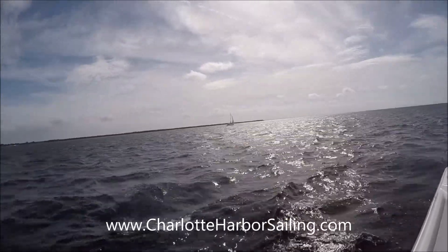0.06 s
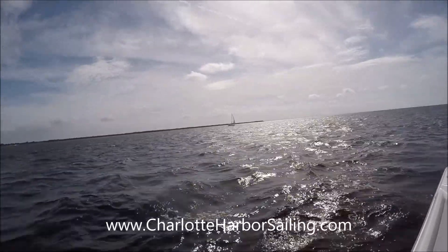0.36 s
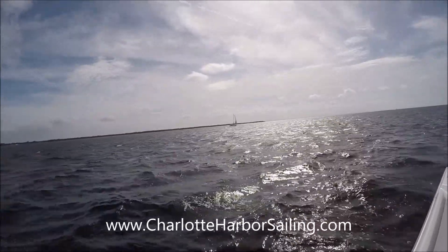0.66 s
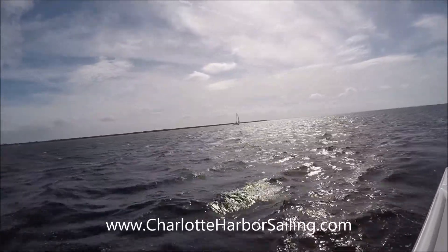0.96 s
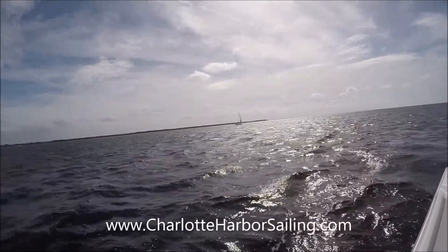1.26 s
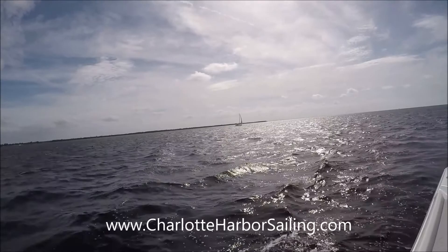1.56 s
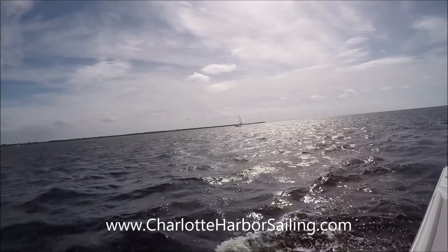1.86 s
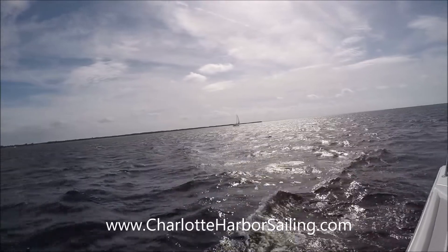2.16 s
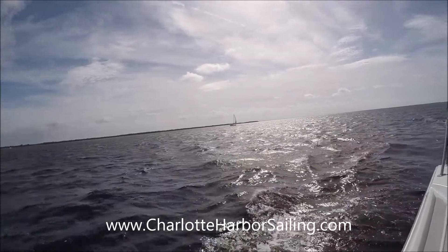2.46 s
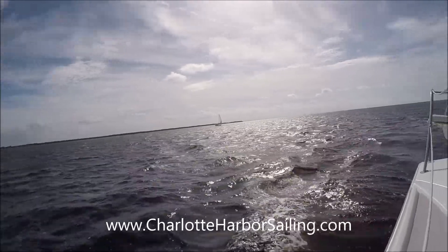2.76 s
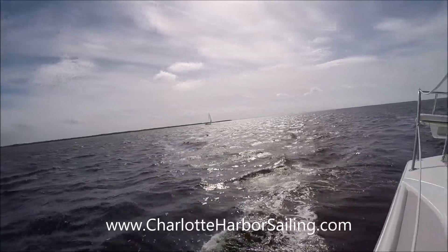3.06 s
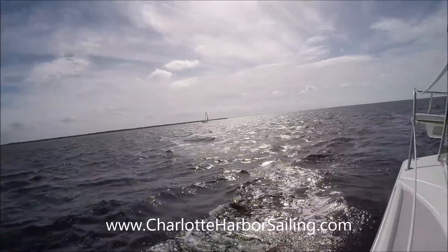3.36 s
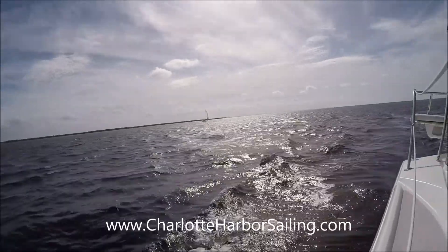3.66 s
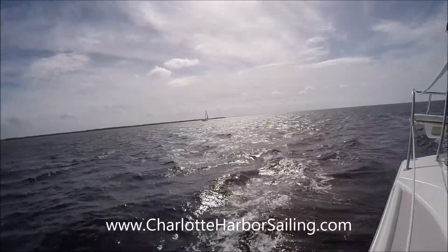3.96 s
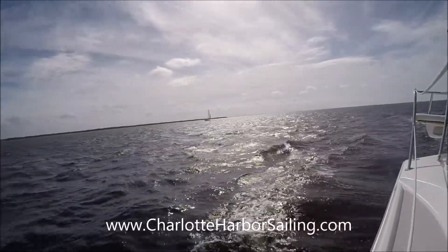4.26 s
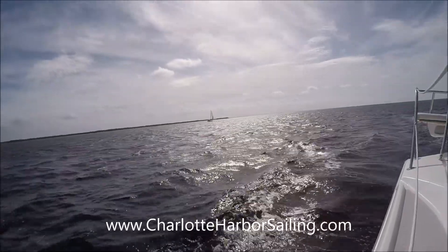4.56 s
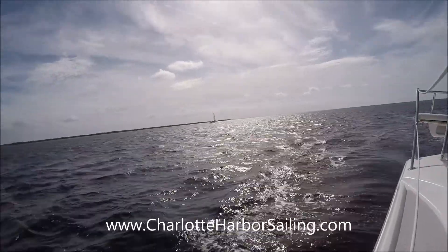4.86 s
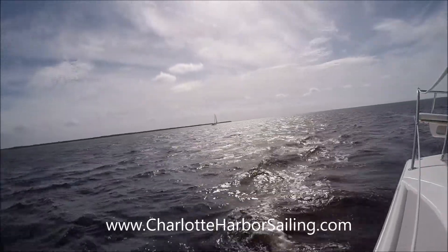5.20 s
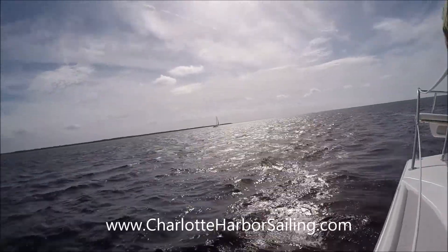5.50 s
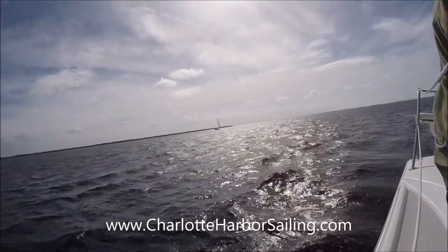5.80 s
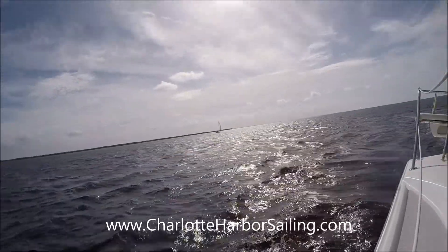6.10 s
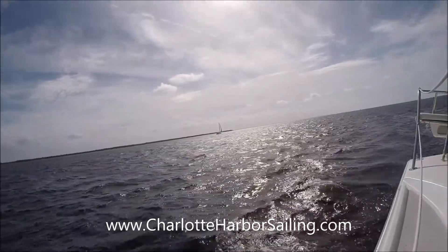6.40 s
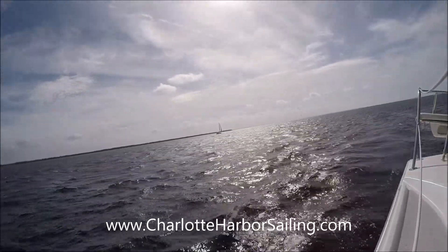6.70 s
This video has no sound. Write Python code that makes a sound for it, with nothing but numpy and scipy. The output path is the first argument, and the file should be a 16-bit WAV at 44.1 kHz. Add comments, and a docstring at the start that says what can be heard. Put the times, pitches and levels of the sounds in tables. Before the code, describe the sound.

Wind buffets a microphone on the deck of a moving sailboat, a deep, booming rumble that lasts the whole seven seconds. Under it, water churns and gurgles along the hull in uneven surges, trailing a hiss of foam and sounding slightly boxy. Bubbles plop at the start, followed by a light patter of spray and a few small slaps before 1 second. Around 1.3 seconds a gust swells with a low thump, then a slap and close drips and bubbles come between 1.5 and 3 seconds. Another gust arrives near 3.7 seconds with a run of wavelets hitting the side. Low thumps land at about 4.3 seconds, and the sharpest slap at 4.7. The wind dips briefly around 5 seconds and then freshens. More slaps come near 6 seconds, and spray and gurgles carry on under the rumble to the end.

```python
"""Wind buffeting a camera microphone on the deck of a moving sailboat.
Gusts set the camera case booming on two low notes, over a slow sway and a drone. Down along the hull
the bow wave churns, gurgles and leaves hissing foam. Bubbles pop and drops land close by, spray
patters back on the sea and wavelets slap the side, all heard through the case, which rings in a few
narrow bands. Gusts popping on the microphone and knocks on the hull add short low thumps."""
import sys
import numpy as np
from scipy import signal
from scipy.fft import rfft, irfft
from scipy.io import wavfile
from scipy.ndimage import uniform_filter1d

SR = 44100
rng = np.random.default_rng(int(sys.argv[2]) if len(sys.argv) > 2 else 0)


def unload_wav(signal):
    """Save mono or channel-first audio to the path in sys.argv[1] as 16-bit WAV at rate SR, clipped to [-1, 1]."""
    wavfile.write(
        sys.argv[1],
        SR,
        np.round(np.clip(np.atleast_2d(signal).T, -1, 1) * 32767).astype(np.int16),
    )


N = 301644
T = np.arange(N) / SR
HZ = np.fft.rfftfreq(N, 1 / SR)


def amp(db):
    """Decibels to gain."""
    return 10 ** (np.asarray(db) / 20)


def unit(x):
    """Scales to an rms of one."""
    return x / np.sqrt(np.mean(x ** 2) + 1e-20)


def spectrum_gain(spectrum, hz):
    """Gain of a spectrum table at the given frequencies."""
    freq_hz, level_db = np.transpose(spectrum)
    return amp(np.interp(np.log(hz + 1), np.log(freq_hz), level_db))


def fader(curve):
    """Turns rows of time_s, level_db into a gain for every sample."""
    return amp(np.interp(T, *np.transpose(curve)))


def add(mix, start_s, sound):
    """Mixes a sound in at its start time."""
    part = mix[max(round(start_s * SR), 0):][:len(sound)]
    part += sound[:len(part)]


def colour(x, spectrum):
    """Filters by a spectrum table; rms one."""
    return unit(irfft(rfft(x) * spectrum_gain(spectrum, HZ), N))


def flicker(depth_db, rate_hz):
    """A gain that wanders smoothly at random, by depth_db rms."""
    lowpass = np.exp(-(HZ / rate_hz) ** 2) * (HZ > 0)
    return amp(depth_db * unit(irfft(rfft(rng.standard_normal(N)) * lowpass, N)))


# Buffeting right at the microphone, peaking on the two notes of the case: freq_hz, level_db
BOOM_SPECTRUM = [(25, -11), (42, -7.5), (55, -7), (64, 3), (73, -5.5), (83, 1), (92, -6), (100, -15),
                 (118, -27.5), (160, -34), (300, -70), (600, -84)]
# What the upper note gains and the lower one loses: time_s, tilt_db
BOOM_TILT = [(0.0, -2), (1.4, 0), (2.9, -2.5), (3.8, 1), (5.8, 0), (6.84, 4.5)]


def case_boom(gust, split_hz=67.6):
    """Eddies set the camera case booming; the freshening wind favours its upper note."""
    pressure = colour(rng.standard_normal(N), BOOM_SPECTRUM)
    power = uniform_filter1d(uniform_filter1d(pressure ** 2, size=5000), size=3000) + 1e-6
    eddies = unit(pressure / power ** 0.25)  # a steady breeze evens out the deepest lulls
    speed = uniform_filter1d(gust, size=12000) ** 0.0815  # faster air sheds eddies faster
    travel = np.cumsum(speed / speed.mean())
    boom = np.interp(travel, np.arange(N), eddies)
    lower = irfft(rfft(boom) / (1 + (HZ / split_hz) ** 20), N)
    upper = boom - lower
    tilt = fader(BOOM_TILT)
    return gust * (lower / tilt + upper * tilt)


# Strength of the wind on the camera, out on deck: time_s, level_db
GUSTS = [(0.1, -21.5), (0.85, -26.5), (1.12, -26.5), (1.33, -18.5), (1.62, -23.5), (1.86, -21), (2.02, -27),
         (2.85, -22), (3.5, -24.5), (3.76, -18.5), (4.05, -24), (4.36, -20.5), (4.8, -21), (4.96, -27),
         (5.22, -27), (5.32, -21.5), (6.84, -20)]
# Slow sway of pressure and low drone at the microphone: freq_hz, level_db
SWAY_SPECTRUM = [(4, -45), (17, -14), (25, 1), (32, -9), (50, -13), (120, -70)]
DRONE_SPECTRUM = [(70, -25), (125, -1.5), (165, -3), (212, 1), (242, 0.5), (270, -6.5), (300, -13.5),
                  (370, -20.5), (520, -26.5), (1200, -56)]
# The sway as the breeze eases and freshens, and the drone in an average wind: time_s, level_db
SWAY_LEVEL = [(0.0, -27), (1.8, -36.5), (2.4, -53), (3.3, -33), (4.1, -31.5), (5.1, -29), (5.8, -29),
              (6.2, -38.5), (6.84, -27)]
DRONE_LEVEL = [(0.0, -41), (1.25, -41), (2.9, -44.5), (3.3, -42), (4.1, -42.5), (4.55, -38.5), (4.85, -42),
               (6.1, -40), (6.84, -40)]


def wind(mean_wind_db=-21, drone_follows=0.3):
    """Air flowing round the camera booms, sways and drones; the drone takes a share of each gust."""
    gust = fader(GUSTS)
    boom = amp(-0.34) * case_boom(gust)
    sway = amp(-1.0) * fader(SWAY_LEVEL) * colour(rng.standard_normal(N), SWAY_SPECTRUM)
    drone_gain = amp(0.5) * fader(DRONE_LEVEL) * (gust / amp(mean_wind_db)) ** drone_follows
    drone = drone_gain * colour(rng.standard_normal(N), DRONE_SPECTRUM)
    return boom + sway + drone * flicker(depth_db=2.13, rate_hz=18)


def ring(hz, ring_s, rise=0.054):
    """A damped tone, slower to build the longer it lasts, rising like a bubble nearing the surface."""
    age = np.arange(0, ring_s, 1 / SR) / ring_s
    attack_share = 0.6 * ring_s
    envelope = (1 - np.exp(-age / attack_share)) * amp(-60 * age)
    return envelope * np.sin(2 * np.pi * hz * ring_s * age * (1 + rise * age))


def bubble_swarm(low_hz, high_hz, per_s, spread_db, cycles):
    """Bubbles of all sizes ring at random moments, a few louder than the rest."""
    out = np.zeros(N)
    when, strength, polarity, size = rng.random((40000, 4))[:int(per_s * N / SR)].T
    gains = amp(spread_db * np.minimum(-np.log(1 - strength), 4.5)) * np.sign(polarity - 0.5)
    pitches = np.geomspace(low_hz, high_hz, num=36)
    pitch_index = (size * len(pitches)).astype(int)
    for k, hz in enumerate(pitches):
        chosen = pitch_index == k
        clicks = np.bincount((when[chosen] * N).astype(int), gains[chosen], N)
        out += signal.oaconvolve(clicks, ring(hz, cycles / hz) * hz / high_hz)[:N]
    return unit(out)


def rush(patchy_db):
    """Rushing water: noise that comes and goes in patches of time and pitch."""
    frames = dict(nperseg=256, noverlap=192)
    noise = signal.stft(rng.standard_normal(N), **frames)[2]
    patches = uniform_filter1d(rng.standard_normal(noise.shape), size=5, axis=0)
    patches = unit(uniform_filter1d(patches, size=16, axis=1))
    return unit(signal.istft(noise * amp(patchy_db * patches), **frames)[1][:N])


def surge(peak_s, level_db, rise_s, fall_s):
    """Power of a swell that builds to its peak and dies away."""
    from_peak = (T - peak_s) / np.where(T < peak_s, rise_s, fall_s)
    return (amp(level_db) / np.cosh(np.clip(from_peak * np.sqrt(2), -30, 30))) ** 2


# Steady wash along the hull, below the microphone: time_s, level_db
WASH = [(0.0, -6), (1.3, 3), (1.7, 0.5), (2.25, 0.5), (3.0, 4), (4.05, -3), (5.05, -5), (5.6, -1),
        (6.15, -5), (6.84, -7)]
# Waves folding over at the bow: fold_s, gurgle_db, churn_db, churn_rise_s, foam_db, foam_delay_s
BOW_FOLDS = [(0.022, -43.5, -44, 0.11, -57, 0.095), (0.494, -42.5, -44, 0.15, -50.5, 0.21),
             (0.828, -51, -39, 0.12, -54, 0.22), (1.255, -57, -91, 0.11, -52, 0.075),
             (1.41, -50, -60, 0.046, -58, 0), (1.907, -52.5, -41, 0.12, -59.5, 0.0),
             (2.12, -57, -81, 0.055, -53.5, 0.13), (2.394, -51, -52, 0.25, -52, 0.11),
             (2.655, -47.5, -42.5, 0.041, -51, 0.016), (3.343, -50, -48, 0.046, -58.5, 0.05),
             (3.758, -51, -44.5, 0.057, -59.5, 0.041), (4.16, -58, -44.5, 0.08, -60, 0.07),
             (4.507, -43, -46, 0.28, -55.5, 0.16), (4.816, -41.5, -41.5, 0.068, -57, 0.07),
             (5.204, -48.5, -47.5, 0.11, -58, 0.11), (5.49, -68, -47.5, 0.049, -56, 0.03),
             (5.992, -49.5, -57, 0.078, -78, 0.02), (6.312, -43, -47, 0.13, -71, 0.094),
             (6.757, -51, -48.5, 0.18, -68, 0.05)]


def bow_wave_gains(churn_delay_s=0.0071, churn_linger=2.14):
    """Churn, gurgle and foam each follow the wash and surge with every wave that folds over."""
    wash = fader(WASH)
    churn = (amp(-45.5) * wash ** 0.43) ** 2
    gurgle = (amp(-55.5) * wash ** 0.23) ** 2
    foam = (amp(-60) * wash ** 1.32) ** 2
    for fold_s, gurgle_db, churn_db, churn_rise_s, foam_db, foam_delay_s in BOW_FOLDS:
        gurgle += surge(fold_s, gurgle_db, rise_s=0.051, fall_s=0.078)
        churn += surge(fold_s + churn_delay_s, churn_db, churn_rise_s, churn_rise_s * churn_linger)
        foam += surge(fold_s + foam_delay_s, foam_db, rise_s=0.091, fall_s=0.1)
    return np.sqrt([churn, gurgle, foam])


# The three layers of the bow wave from the deck, before the case colours them: freq_hz, level_db
CHURN_SPECTRUM = [(300, -47), (600, -7), (1100, 0.5), (1430, -2.5), (1680, 6.5), (1800, 2), (2250, -1.5),
                  (2700, -3), (3080, -9.5), (3600, -9.5), (5000, -26), (15000, -60)]
GURGLE_SPECTRUM = [(250, -17), (400, -2.5), (530, -10.5), (690, 5.5), (850, -2.5), (1200, -20.5),
                   (1800, -29), (4000, -63)]
FOAM_SPECTRUM = [(1500, 1.5), (3050, 1.5), (3950, 8.5), (4450, 1), (5200, -8), (6200, -3.5), (7300, -2.5),
                 (8600, -10.5), (11000, -13), (13300, -9.5), (16000, -19)]


def bow_wave():
    """Mid-sized bubbles churn along the hull, large ones gurgle, and the foam fizzes away."""
    churn_gain, gurgle_gain, foam_gain = bow_wave_gains()
    breaking = 1 / (1 + (amp(-36.5) / churn_gain) ** 2)  # a quiet wash is smooth, a crest is bubbly
    churn = np.sqrt(1 - breaking) * rush(patchy_db=-0.2)
    churn += np.sqrt(breaking) * bubble_swarm(1072, 3583, per_s=800, spread_db=1.5, cycles=41.4)
    gurgle = rush(patchy_db=8.0)
    gurgle += amp(-12.5) * bubble_swarm(506, 1316, per_s=300, spread_db=0.5, cycles=37)
    foam = rush(patchy_db=1.64)
    foam += amp(-5.5) * bubble_swarm(3560, 14200, per_s=900, spread_db=1.5, cycles=13)
    churn = amp(-1.64) * colour(churn, CHURN_SPECTRUM) * flicker(depth_db=1.1, rate_hz=27)
    gurgle = amp(-0.5) * colour(gurgle, GURGLE_SPECTRUM)
    foam = amp(2.0) * colour(foam, FOAM_SPECTRUM) * flicker(depth_db=1.45, rate_hz=25)
    return churn_gain * churn + gurgle_gain * gurgle + foam_gain * foam


# Single bubbles and drops of spray close to the microphone: start_s, level_db, pitch_hz, ring_s
CLOSE_BUBBLES = [(0.012, -21, 695, 0.093), (0.024, -20, 807, 0.051), (1.426, -15, 2040, .025),
                 (1.549, -24, 2300, 0.014), (1.947, -16, 2380, 0.027), (2.034, -23, 2360, 0.048),
                 (2.084, -21, 2830, 0.032), (2.953, -22.5, 1620, 0.042), (3.074, -16, 689, 0.16),
                 (3.933, -36.5, 6430, 0.014), (4.209, -29, 6600, 0.0073), (5.947, -27, 655, 0.04),
                 (6.768, -20, 695, 0.064)]


def close_bubbles():
    """Each bubble or drop rings briefly as a pocket of air in the water."""
    out = np.zeros(N)
    for start_s, level_db, pitch_hz, ring_s in CLOSE_BUBBLES:
        add(out, start_s, amp(level_db) * ring(pitch_hz, ring_s))
    return out


# Sheets of spray falling back on the sea beside the boat: peak_s, level_db, half_length_s
SPRAY_SHEETS = [(0.314, -50, 0.1), (6.377, -51.5, 0.092), (6.71, -54.5, 0.24)]
# Their patter from the deck: freq_hz, level_db
SPRAY_SPECTRUM = [(1800, -14.5), (2800, 1), (3700, -1), (4800, -19.5), (9000, -47)]


def spray():
    """Small drops patter onto the water in brief bright swells."""
    swell = sum(amp(level_db) * np.exp(-((T - peak_s) / half_length_s) ** 2)
                for peak_s, level_db, half_length_s in SPRAY_SHEETS)
    return swell * colour(rush(patchy_db=4.5), SPRAY_SPECTRUM)


# Wavelets hitting the side, below the deck: start_s, level_db, bright_hz, spread_hz, decay_s
HULL_SLAPS = [(0.504, -17.5, 2200, 700, 0.071), (0.575, -18, 2070, 700, 0.023),
              (0.79, -22, 1700, 600, 0.042), (0.860, -23, 1950, 696, 0.025),
              (1.451, -13.5, 1980, 400, 0.036), (3.705, -16.5, 1600, 500, 0.036),
              (3.8, -18, 2000, 900, 0.038), (3.850, -17, 1660, 500, 0.026), (4.187, -22, 2340, 600, 0.047),
              (4.301, -18.5, 1290, 1200, 0.025), (4.410, -25.5, 2100, 1200, 0.017),
              (4.627, -12.5, 1770, 1130, 0.04), (4.700, -4, 1900, 1700, 0.012),
              (5.540, -24.5, 1700, 600, 0.035), (5.966, -22.5, 2700, 600, 0.028),
              (5.992, -11, 1750, 550, 0.028), (6.059, -17, 1540, 600, 0.048),
              (6.755, -20.5, 1490, 600, 0.055)]
# Tone shared by their cracks and splashes: freq_hz, level_db
SLAP_SPECTRUM = [(200, -34), (500, -4.5), (850, 1), (1500, 2.5), (2050, 5.5), (2800, -2), (3600, -3),
                 (4800, -15), (7000, -15), (12000, -19.5)]


def hull_slaps():
    """A wavelet claps shut on the hull: a crack round one pitch, a panel knock, then a duller splash."""
    out = np.zeros(N)
    t = np.arange(SR // 8) / SR
    hz = np.fft.rfftfreq(len(t), 1 / SR)
    for start_s, level_db, bright_hz, spread_hz, decay_s in HULL_SLAPS:
        noise = spectrum_gain(SLAP_SPECTRUM, hz) * np.exp(2j * np.pi * rng.random((2, len(hz))))
        crack = unit(irfft(noise[0] / np.hypot(1, ((hz - bright_hz) / spread_hz) ** 2), len(t)))
        splash = unit(irfft(noise[1] / np.hypot(1, (hz / 1100) ** 3), len(t)))
        attack_s = 0.00097 * (decay_s / 0.029) ** 2  # a flat hit is sudden, a glancing one long and soft
        crack *= (1 - np.exp(-t / attack_s)) * amp(-60 * t / decay_s)
        splash *= (1 - np.exp(-t / 0.0092)) * amp(-60 * t / (2.13 * decay_s))
        knock = ring(hz=885, ring_s=0.057, rise=0)
        add(out, start_s, amp(level_db - 11) * crack + amp(level_db - 18) * splash)
        add(out, start_s + 0.00149, amp(level_db - 23.5) * knock)
    return out


# Gusts popping on the microphone and knocks on the hull: start_s, level_db, pitch_hz, ring_s
LOW_THUMPS = [(1.195, -13, 108, 0.035), (1.325, -6.5, 73.4, 0.12), (3.228, -15, 126, 0.043),
              (3.691, -23, 159, 0.055), (4.305, -3, 94, 0.045), (4.305, -16.5, 202, 0.08),
              (4.361, 2.5, 55.5, 0.1), (4.699, -14.5, 856, 0.014)]


def low_thumps():
    """Each wind pop or hull knock is a short thump on one damped tone."""
    out = np.zeros(N)
    for start_s, level_db, pitch_hz, ring_s in LOW_THUMPS:
        add(out, start_s, amp(level_db) * ring(pitch_hz, ring_s))
    return out


# Resonances of the case around the microphone: pitch_hz, width_hz, boost_db
CASE_RESONANCES = [(827, 42, 6.5), (1970, 26, 4.5), (2383, 110, 6), (2940, 14, 5), (3440, 56, 1.5),
                   (4820, 210, 5.5), (5570, 420, 8), (6370, 130, 5), (6730, 190, 7), (6980, 86, 7.5),
                   (9710, 380, 8)]


def camera_case(sound):
    """The camera case lifts a few narrow bands, each ringing briefly."""
    out = sound.copy()
    for pitch_hz, width_hz, boost_db in CASE_RESONANCES:
        band = signal.lfilter(*signal.iirpeak(pitch_hz, pitch_hz / width_hz, fs=SR), sound)
        out += (amp(boost_db) - 1) * band
    return out


def scene():
    """One microphone on deck: water heard through the case, under low thumps and the wind."""
    water = bow_wave() + amp(-10) * close_bubbles() + spray() + hull_slaps()
    return (camera_case(water) + amp(-2.5) * low_thumps() + wind())[None]


def record(dry, cutoff_hz=15200):
    """The camera cuts off the highest treble."""
    lowpass = signal.firwin(511, cutoff_hz, window=("kaiser", 9), fs=SR)
    return signal.oaconvolve(dry, lowpass[None], "same")


dry = scene()
out = record(dry)
unload_wav(out)
```